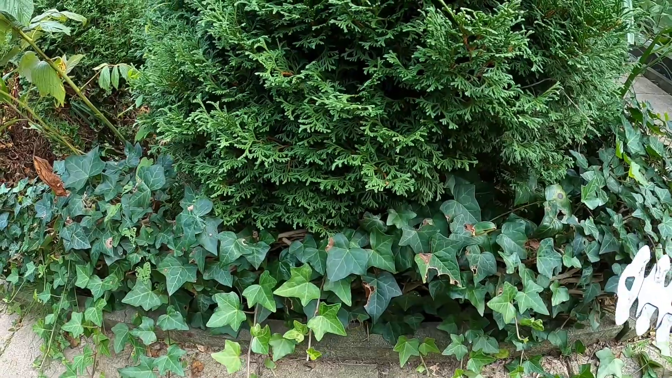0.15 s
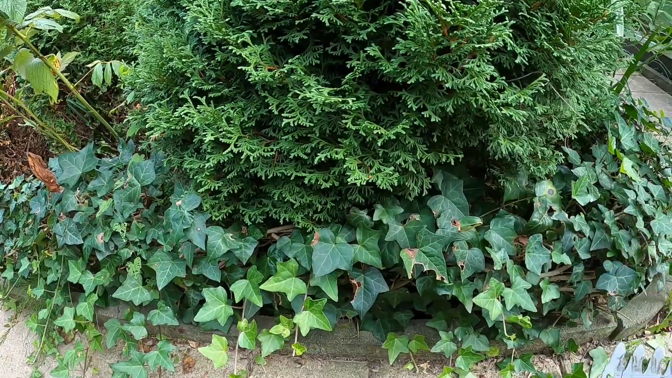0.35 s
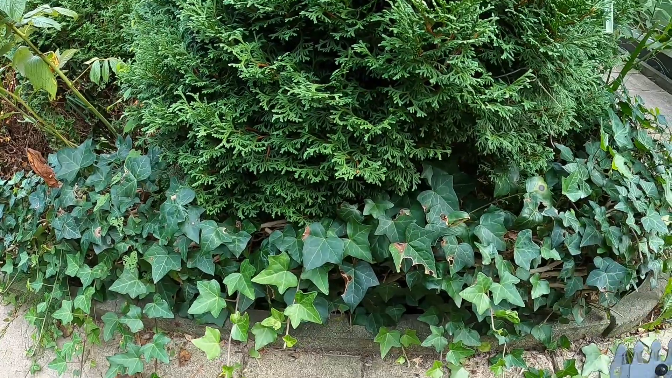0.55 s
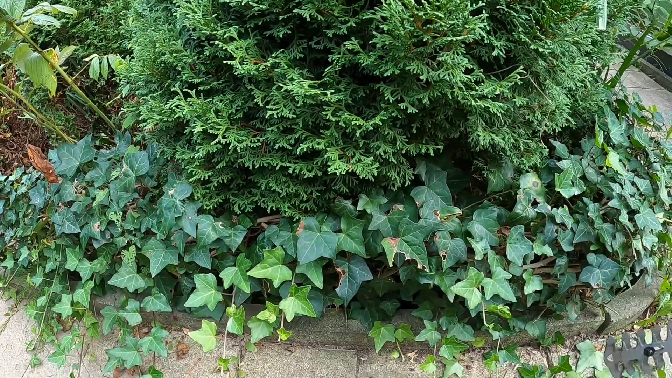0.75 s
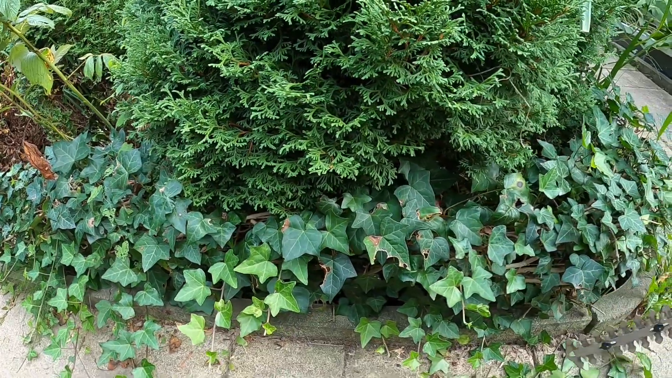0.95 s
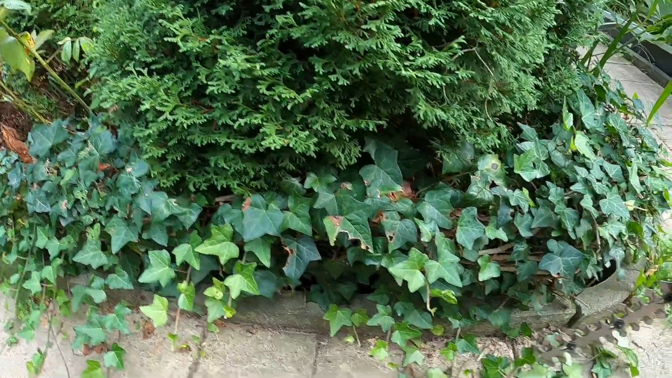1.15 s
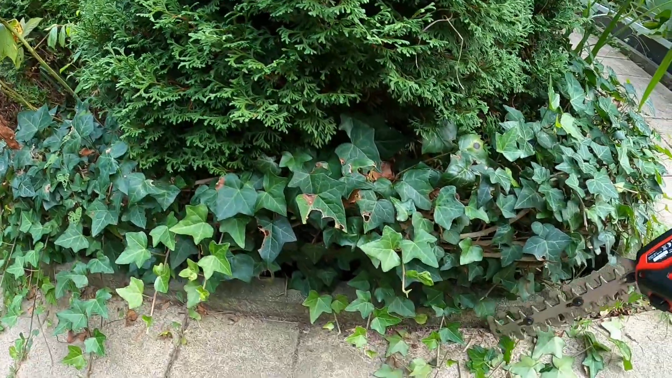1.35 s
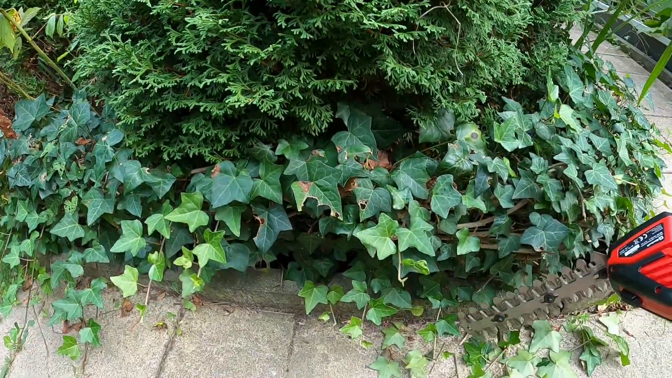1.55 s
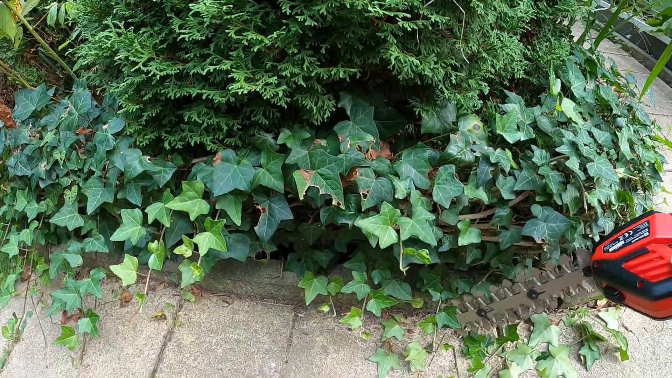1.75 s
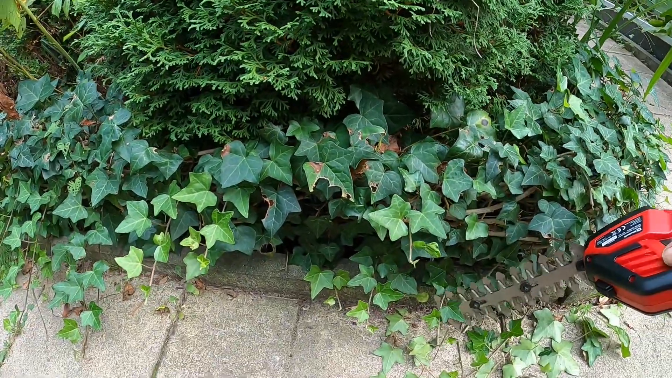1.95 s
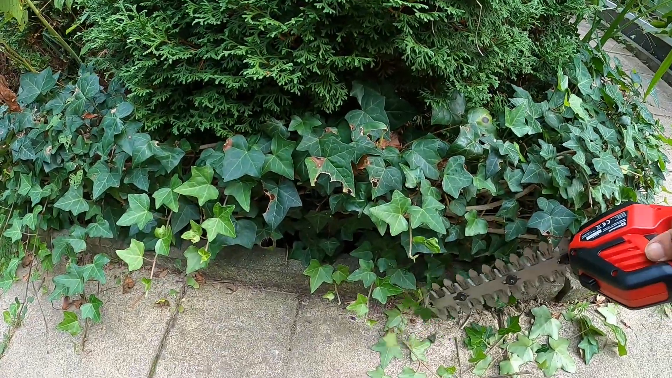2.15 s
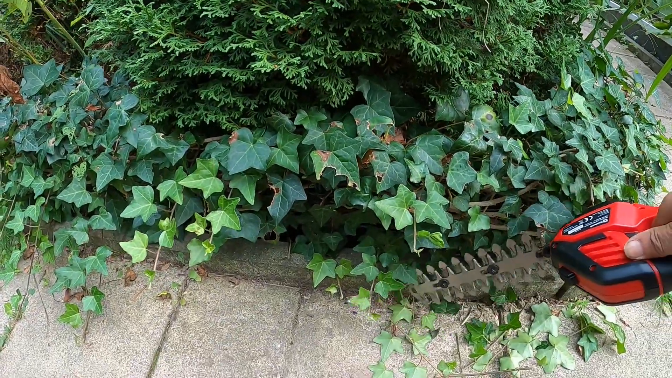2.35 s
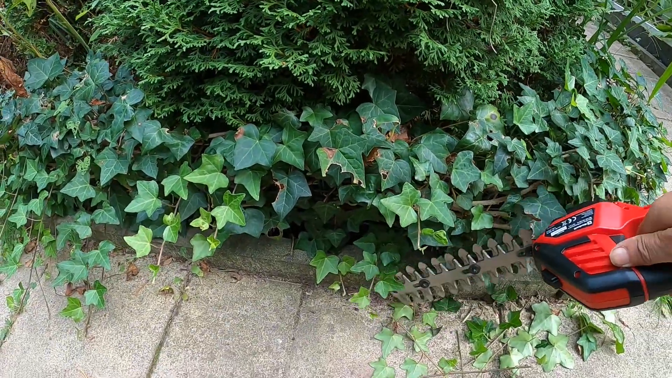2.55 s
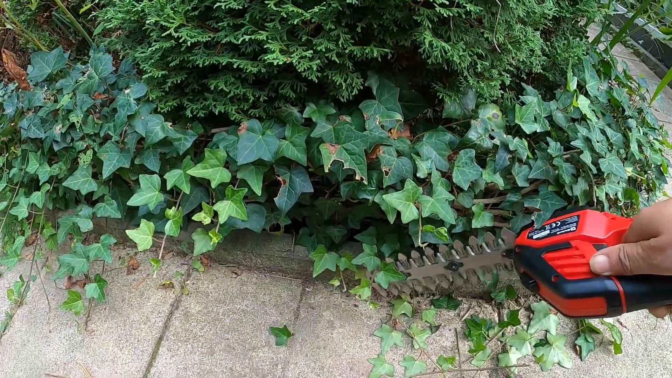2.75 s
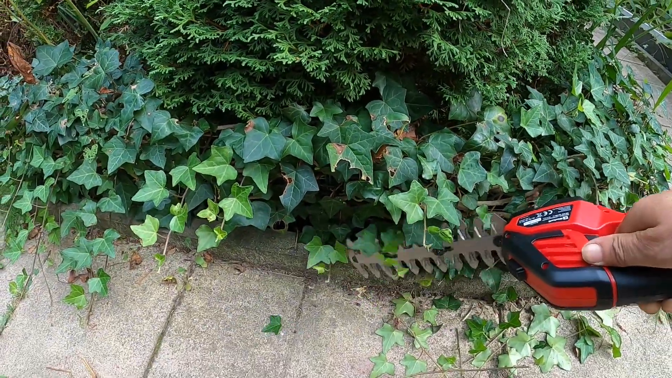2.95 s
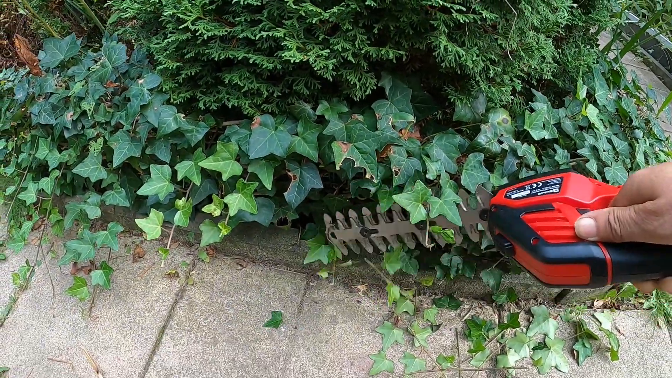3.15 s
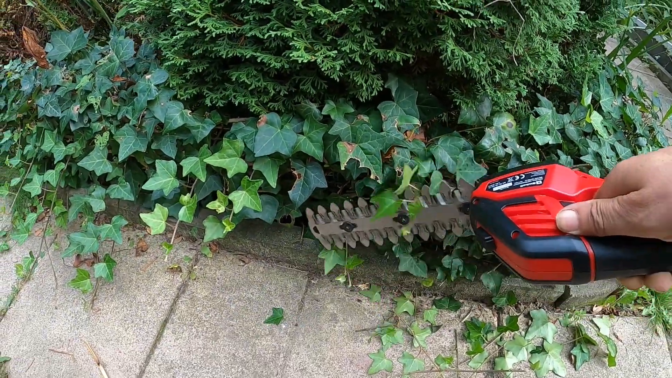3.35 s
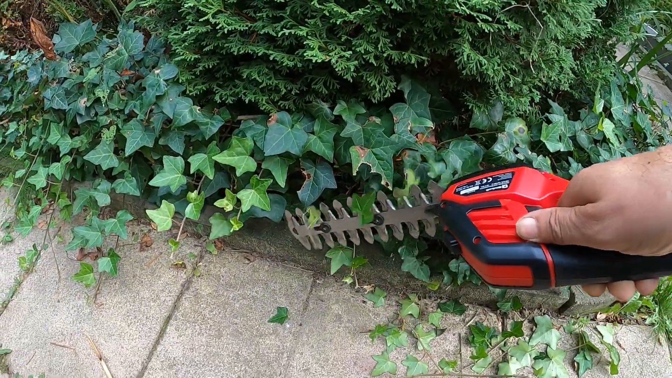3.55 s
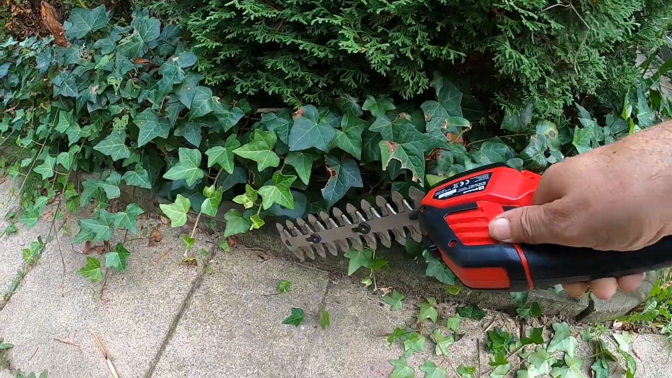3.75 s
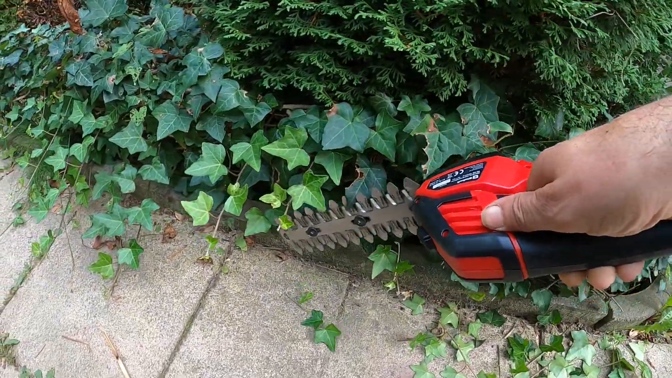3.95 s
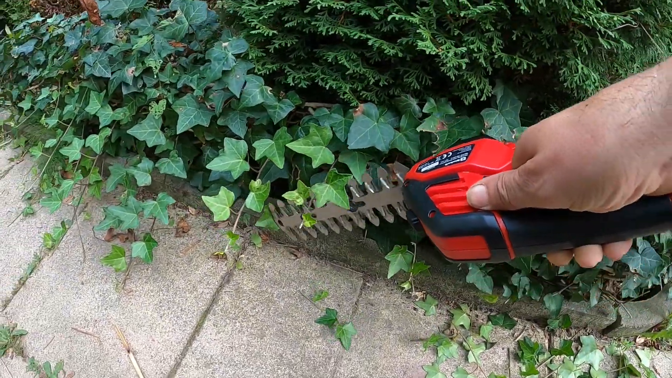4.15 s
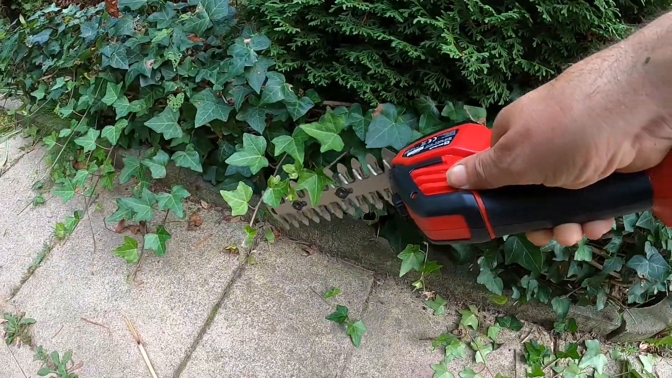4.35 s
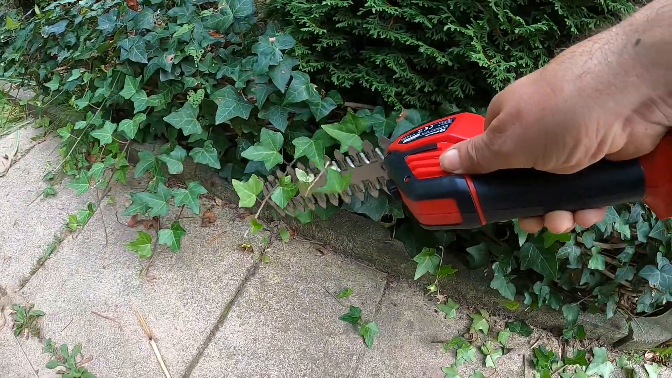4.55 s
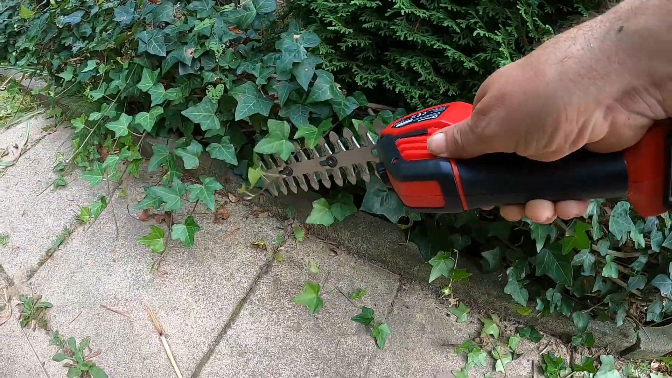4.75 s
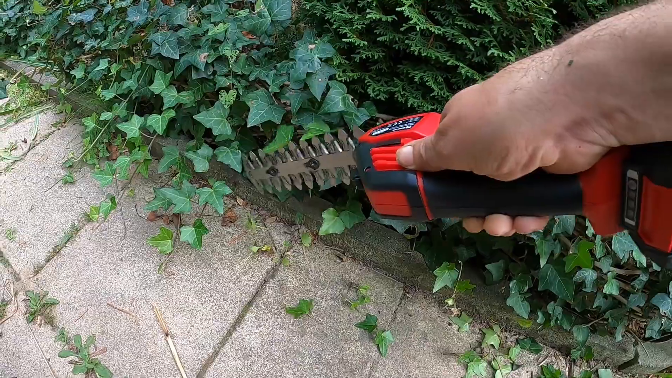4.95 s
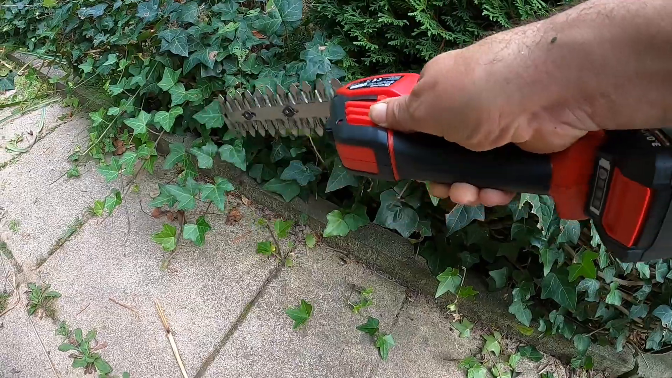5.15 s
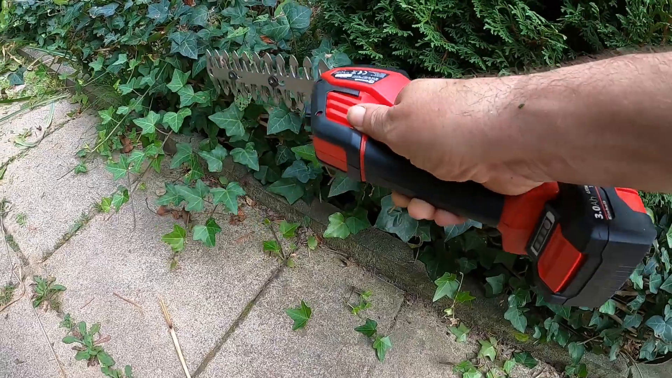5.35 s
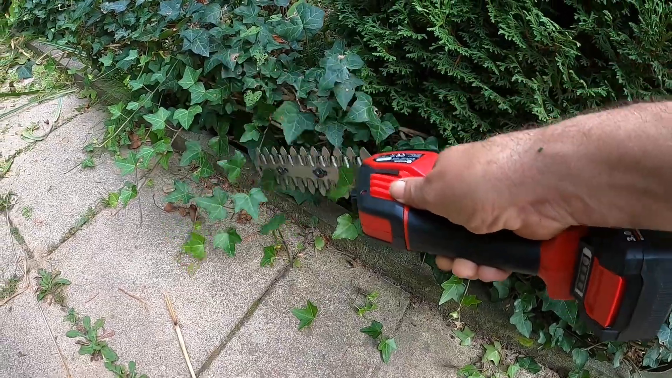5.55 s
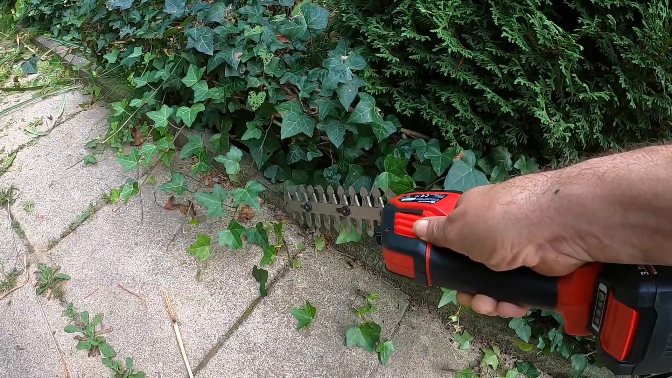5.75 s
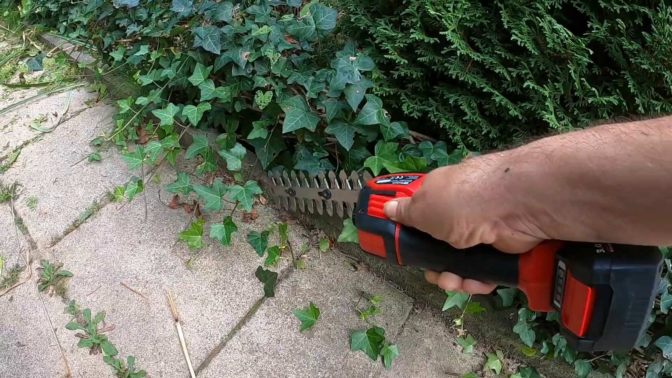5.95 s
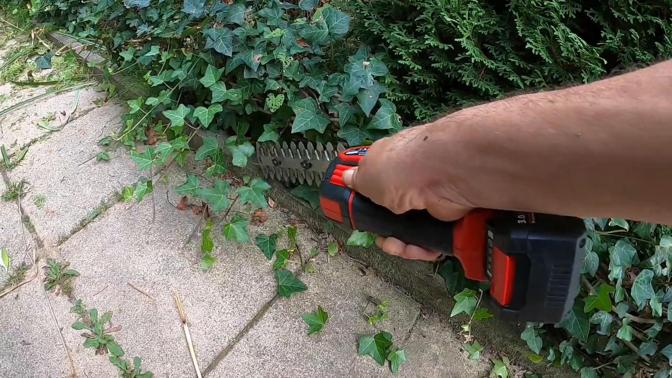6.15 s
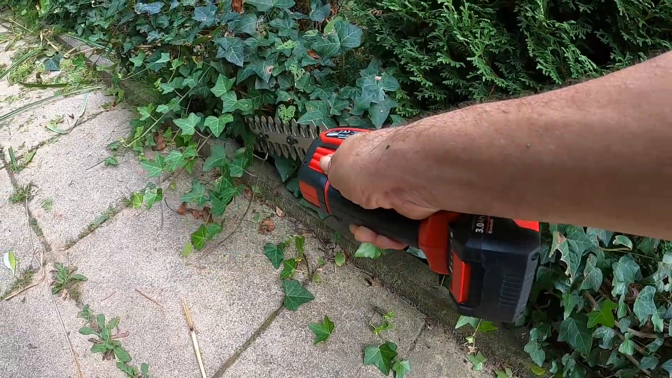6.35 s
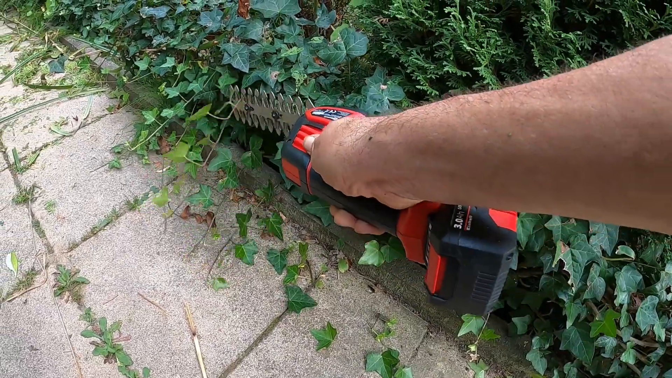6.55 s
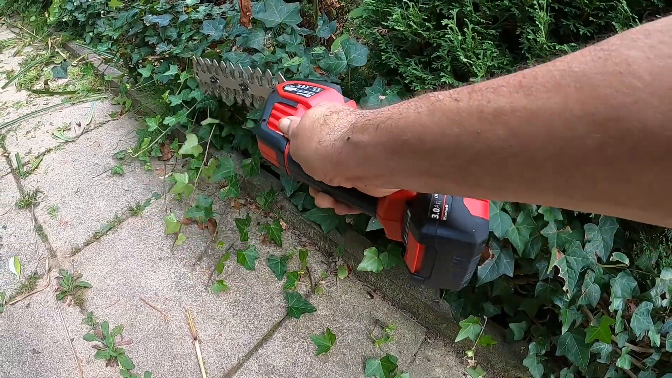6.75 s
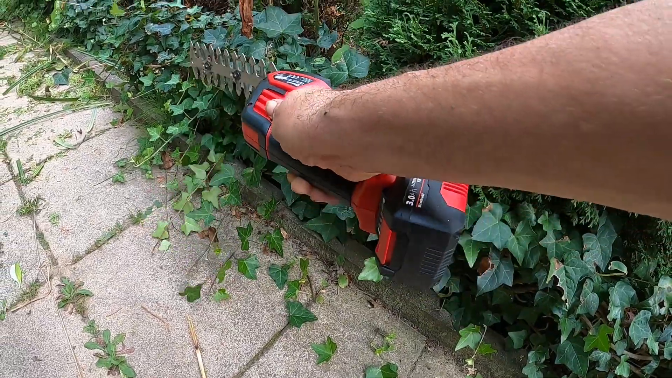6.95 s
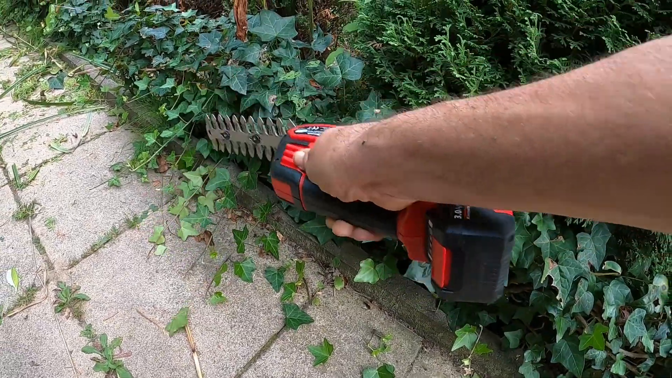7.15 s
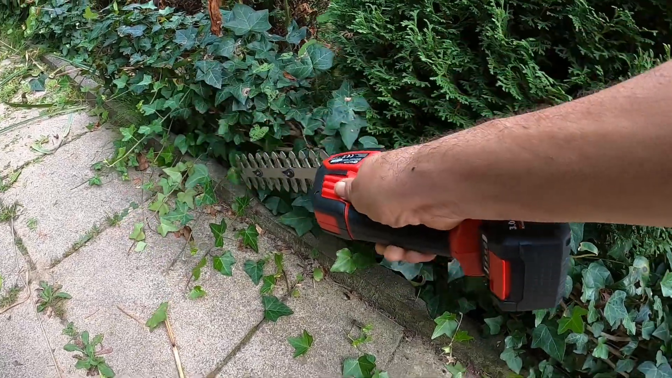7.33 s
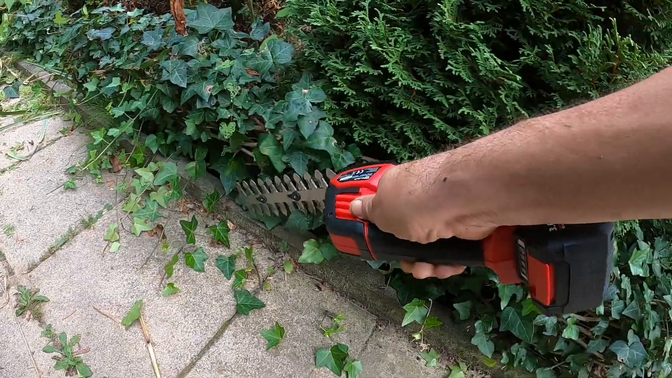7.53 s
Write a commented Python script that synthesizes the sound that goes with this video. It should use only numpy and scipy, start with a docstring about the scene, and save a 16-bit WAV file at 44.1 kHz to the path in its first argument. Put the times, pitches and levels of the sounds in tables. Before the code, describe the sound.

A brief quiet moment of distant traffic, fading far whine and thin bird whistles, then a light click and a cordless hedge trimmer bursts on at arm's length. Dry, bright, buzzing gear rattle pulses rapidly as the blades reverse, its tone shifting as the tool swings. Close open-air stereo pickup with slight reflections from paving and hedge; it is still running when the sound ends.

```python
"""Traffic rumble, road hiss, a distant engine and a fading far whine lie behind two thin bird whistles.
A switch ticks; an arm's length to the right a battery hedge trimmer starts and swings round to ahead.
A 9-tooth pinion drives a 38-tooth crank gear: teeth rattle harder under load and float as blades reverse.
Noise blows ring the casing, sines make the gear whine; paving, kerb and hedge return delayed copies."""
import sys
import numpy as np
from scipy import signal
from scipy.fft import rfft, irfft, next_fast_len
from scipy.io import wavfile
from scipy.ndimage import uniform_filter1d, map_coordinates

SR = 44100
rng = np.random.default_rng(int(sys.argv[2]) if len(sys.argv) > 2 else 0)


def boost(x):
    """Linear amplitude factor 10**(x/20) for a level x in decibels (scalar or array-like)."""
    u = np.asarray(x, float) / 20
    return 10 ** u


def generate_wav(signal):
    """Clip the signal to [-1, 1] and save it as 16-bit WAV at the path in sys.argv[1]."""
    frames = np.transpose(np.atleast_2d(signal))
    scaled = np.clip(frames, -1, 1) * 32767
    pcm = np.round(scaled).astype(np.int16)
    wavfile.write(sys.argv[1], SR, pcm)


N = 339129
T = np.arange(N) / SR  # s
HZ = np.fft.rfftfreq(2 * next_fast_len(N // 2 + SR // 8), 1 / SR)  # padded spectrum grid

STROKE_RATE_HZ = 25.865  # crank turns per s
PINION_TEETH, GEAR_TEETH = 9, 38


def shape(x, gain):
    """Multiply the spectrum by a gain on the HZ grid."""
    return irfft(rfft(x, 2 * len(HZ) - 2) * gain)[..., :N]


def points(table):
    """dB of (Hz, dB) points, straight on a log axis."""
    hz, db = np.transpose(table)
    return np.interp(np.log(HZ + 1), np.log(hz), db)


def bell(hz, width_hz):
    """Gain of a resonance, 1 at its centre."""
    return 1 / (1 + (2 * (HZ - hz) / width_hz) ** 2)


def band(low_hz, high_hz):
    """Flat pass band with steep skirts."""
    return 1 / np.sqrt((1 + (low_hz / (HZ + 1)) ** 12) * (1 + (HZ / high_hz) ** 12))


def level(x, db):
    """Set the rms."""
    return x * boost(db) / np.sqrt(np.mean(x ** 2))


def walk(rate_hz):
    """Random levels held 1 / rate_hz s and slewed twice; spread near 1."""
    k = int(SR / rate_hz)
    held = np.repeat(rng.standard_normal(N // k + 1), k)
    return 1.47 * uniform_filter1d(uniform_filter1d(held, k), k)[:N]


def late(x, ms):
    """Delay by a time that may vary from sample to sample."""
    return map_coordinates(x, [np.arange(N) - ms * SR / 1000], order=3)


def after(s, time_constant_s):
    """Smooth step from 0 to 1 around a moment."""
    return .5 + .5 * np.tanh((T - s) / time_constant_s / 2)


def traffic():
    """Deep rumble and drone, nearly alike at both ports, under a wider road hiss that fades with the drone."""
    # traffic levels: time_s, deep_db, drone_db
    passing = [(0.0, -30, -33.5), (1.03, -59, -42.5), (2.48, -45, -43.5), (4.35, -59, -47.5),
               (5.95, -48.5, -52.5), (7.69, -65, -49.5)]
    # drone spectrum: hz, db_per_hz
    drone_colour = [(29, -28), (50, 9), (102, -2.5), (150, -1.5), (327, -9.5), (361, -19), (420, -32),
                    (550, -47), (920, -120)]
    # road hiss spectrum: hz, db_per_hz
    road_colour = [(180, -44), (300, 7.5), (388, -13), (618, -6), (775, -9), (957, -1), (1800, -9),
                   (1970, -8), (3500, -22), (5930, -29.5), (11000, -54), (14300, -91), (22000, -120)]
    s, deep_db, drone_db = np.transpose(passing)
    deep_db, drone_db = np.interp(T, s, deep_db), np.interp(T, s, drone_db)

    mid, side = rng.standard_normal((2, 3, 1, N))
    side_share = np.array([.08, .14, .45])[:, None, None]  # deep, drone, hiss
    noise = mid + side_share * side * np.array([[1], [-1]])

    deep = shape(noise[0], band(16.0, 55) * boost(7.3 * bell(42.0, 3.3)))
    deep = level(deep, 0) * boost(deep_db)
    drone = shape(noise[1], boost(points(drone_colour)) * band(60.0, 258))
    drone = level(drone, 0) * boost(drone_db)
    hiss = level(shape(noise[2], boost(points(road_colour)) * band(318, 10000)), -41.5)
    hiss_db = walk(3.0) + .5 * (drone_db - drone_db[0])
    return deep + drone + hiss * boost(hiss_db)


def engine():
    """A distant engine slows, then picks up in another gear: partials of the firing rate waver singly."""
    # engine run: time_s, firing_hz, level_db
    run = [(0, 41.95, -40), (.3, 41.04, -38), (.8, 40.1, -44), (1.299, 35.5, -53), (2.3, 34.77, -47.5),
           (3.1, 34.37, -48.5), (4.701, 33.5, -63), (5.1, 44.5, -61), (6.5, 44.96, -47.5),
           (7.69, 44.4, -58)]
    # partials: multiple, level_db
    partials = [(1, 0), (2, -8), (3, -8), (4, -4), (6, -11)]
    s, hz, db = np.transpose(run)
    cycles = np.cumsum(np.interp(T, s, hz)) / SR
    hum = np.zeros(N)
    for multiple, partial_db in partials:
        phase_turns = multiple * cycles + rng.random() + .12 * walk(4)
        hum += boost(partial_db + 3 * walk(3)) * np.sin(2 * np.pi * phase_turns)
    return hum * boost(np.interp(T, s, db))


def far_whine():
    """Breathy partials of a far machine: narrow noise bands, fading steadily."""
    # partials before the fade: multiple, rms_db
    partials = [(1, -51), (3, -58), (4, -62)]
    pitch_hz, width_hz, fade_db_per_s = 655, 40, 30
    whines = np.zeros(N)
    for multiple, db in partials:
        noise = rng.standard_normal(N)
        whines += level(shape(noise, bell(multiple * pitch_hz, multiple * width_hz)), db)
    return whines * boost(-fade_db_per_s * T)


def bird():
    """Thin arched whistles, far off: sines that rise to a top pitch and fall again."""
    # whistles: start_s, end_s, level_db
    whistles = [(-.04, 0.047, -68), (.112, 0.19, -68)]
    top_hz, arch_hz = 8260, 1500  # arch: fall to both ends
    out = np.zeros(N)
    for start_s, end_s, db in whistles:
        u = np.clip((T - start_s) / (end_s - start_s), 0, 1)
        hz = top_hz - arch_hz * (2 * u - 1) ** 4
        swell = np.sqrt(np.abs(np.sin(np.pi * u))) * (u < 1)
        out += boost(db) * swell * np.sin(2 * np.pi * np.cumsum(hz) / SR)
    return out


def trigger():
    """A plastic tick as the finger takes up the switch: a 3 ms noise burst through broad resonances."""
    # tick: start_s, peak_db, centre_hz, width_hz
    tick_setting = (.4885, -31, 4800, 220)
    start_s, peak_db, hz, width_hz = tick_setting
    burst = rng.standard_normal(N) * (T > start_s) * (T < start_s + .003)
    tick = shape(burst, (bell(hz, width_hz) + .06 + .35 * bell(2000, 3500)) * band(900, 11000))
    return tick * boost(peak_db) / np.abs(tick).max()


def tooth_load_db(crank, pinion):
    """Load on the teeth from crank angle, off-centre pinion and loss of contact; angles in turns."""
    # load swing over a crank turn: times_per_turn, swing_db, peak_turn
    swings = [(1, 2.1, .041), (2, .75, .18), (3, .75, .236)]
    # crank pin crosses its slot, load slackens, blades are caught again: crank_turn, spread_turns, gain_db
    catches = [(.602, .02, -2.4), (.681, .026, 1.7)]
    # reversal meets the pinion's slack side, teeth lose contact:
    # crank_turn, spread_turns, slack_pinion_turn, slack_spread_turns, gain_db
    contact_loss = (.323, .08, .017, .165, -4.2)
    off_centre_db, off_centre_load_db, off_centre_turn = 1.9, .8, .036
    pinion_high_turn = .51  # presses hardest

    db = sum(swing_db * np.cos(2 * np.pi * times * (crank - turn)) for times, swing_db, turn in swings)
    for turn, spread, catch_db in catches:
        db += catch_db * np.exp(-.5 * ((crank % 1 - turn) / spread) ** 2)
    off_db = off_centre_db + off_centre_load_db * np.cos(2 * np.pi * (crank - off_centre_turn))
    db += off_db * np.cos(2 * np.pi * (pinion - pinion_high_turn))

    middle, spread, slack, slack_spread, float_db = contact_loss
    # pinion angle at the start of each crank turn: nine cases that repeat
    meeting = (np.floor(crank) * GEAR_TEETH / PINION_TEETH - slack + .5) % 1 - .5
    window = np.exp(-.5 * ((crank % 1 - middle) / spread) ** 2)
    return db + float_db * window * np.exp(-.5 * (meeting / slack_spread) ** 2)


def worn_teeth():
    """Noise that partly returns after one pinion turn and after four, as the same flaws meet again."""
    share_one, share_four, fade_hz = .09, .09, 3800  # repeats weaken above fade_hz
    turn = np.exp(-2j * np.pi * HZ * PINION_TEETH / GEAR_TEETH / STROKE_RATE_HZ)
    again = (share_one * turn + share_four * turn ** 4) / np.sqrt(1 + (HZ / fade_hz) ** 6)
    return shape(rng.standard_normal(N), 1 / (1 - again))


def rattle(crank, pinion):
    """Uneven tooth blows and sliding steel ring the casing; a fan hisses and reversing blades knock."""
    # casing spectrum: hz, db_per_hz
    body = [(120, -27), (200, -18.5), (385, -19), (653, -4), (827, -5), (1230, -0.5), (1740, -2.5),
            (1910, -1), (2420, -4.5), (3300, 0), (4830, -4.5), (5390, -5), (6470, -10.5), (12500, -34),
            (15500, -50)]
    # casing resonances: hz, width_hz, gain_db
    casing = [(1200, 460, 0), (2280, 74, 1), (3780, 330, 3), (4900, 500, 2), (2780, 250, 2.5),
              (3244, 180, 4), (6280, 200, 4)]
    # knock bands: hz, width_hz, rms_db
    knock_bands = [(720, 220, -22.5), (5300, 3000, -25)]
    heavy_hz, heavy_share = 1400, .6  # heavy lower casing follows only this share of the load swing in dB
    fan_db, fan_hz = -18.5, 9400  # rms against the teeth; stronger above fan_hz
    knock_turn, knock_s = 0.473, 0.0026

    colour = boost(points(body) + sum(db * bell(hz, width_hz) for hz, width_hz, db in casing))
    tooth = (pinion * PINION_TEETH).astype(int)
    size = boost(1.5 * rng.standard_normal(tooth[-1] + 1))[tooth]
    blow = 1 + .35 * np.exp(-(pinion * PINION_TEETH % 1) / .3)
    blows = worn_teeth() * size * blow
    load = boost(tooth_load_db(crank, pinion) + .4 * walk(9) + .6 * walk(90))
    heavy = 1 / (1 + (HZ / heavy_hz) ** 4)
    light_part = shape(blows * load, colour * (1 - heavy))
    heavy_part = shape(blows * load ** heavy_share, colour * heavy)
    teeth = level(light_part + heavy_part, 0)

    fan = level(shape(rng.standard_normal(N), colour * (0.43 + band(fan_hz, 20000))), fan_db)

    since_s = (crank - knock_turn) % 1 / STROKE_RATE_HZ
    pulse = since_s / knock_s * np.exp(-2 * since_s / knock_s)
    hit = rng.standard_normal(N) * pulse * boost(1.5 * walk(25))
    knock = sum(level(shape(hit, bell(hz, width_hz) * band(280, 15000)), db)
                for hz, width_hz, db in knock_bands)
    return teeth + fan + knock


def whine(pinion, ahead):
    """Gear tones around the tooth rate, wavering and growing as the gearbox comes round."""
    # tones: pinion_order, rms_db halfway round, gain_db from far right to ahead
    tones = [(8, -48, 11), (9, -45.5, 8), (10, -44.5, 5), (11, -46, 3), (18, -47, 1), (20, -49, 2)]
    out = np.zeros(N)
    for order, db, ahead_db in tones:
        size = np.sqrt(2) * boost(db + ahead_db * ahead + 1.2 * walk(2.5))
        phase_turns = order * pinion + rng.random() + 0.12 * walk(2.0)
        out += size * np.sin(2 * np.pi * phase_turns)
    return out


def colour_swell(x, middle_s, length_s, hz, glide_hz_per_s, gain_db):
    """What a passing boost or dip in tone colour adds: the band around a gliding centre, under a swell."""
    pole_width_hz = 190
    span = np.abs(T - middle_s) < length_s
    since_s = T[span] - middle_s
    turn = np.exp(2j * np.pi * (hz * since_s + glide_hz_per_s * since_s ** 2 / 2))
    pole = np.exp(-np.pi * pole_width_hz / SR)
    # shift the band to 0 Hz, low-pass, shift back
    part = 2 * np.real(turn * signal.filtfilt([1 - pole], [1, -pole], x[span] / turn))
    swell = np.exp(-2 * (since_s / length_s * 2) ** 2)
    out = np.zeros(N)
    out[span] = (boost(gain_db * swell) - 1) * part
    return out


def bounces(x):
    """Kerb, hedge and arm send back weak copies whose delays drift as the tool moves."""
    # nominal delays: delay_ms
    delays_ms = np.array([2.3, 3.9, 6.1, 9.2])
    # reflection of nearby surfaces: hz, gain_db
    scatter = [(300, -25), (1400, -15), (4000, -14.5), (8000, -19.5), (15000, -32)]
    drawn_ms = delays_ms * rng.uniform(.85, 1.15, len(delays_ms))
    total = sum(late(x, ms * (1 + .1 * walk(3))) for ms in drawn_ms)
    return shape(total, boost(points(scatter)))


def trimmer():
    """The tool as two ports hear it, carried from far right to ahead, with paving echo and scatter."""
    # hand path: time_s, level_db, come_round (0-1)
    hand = [(.68, -18.5, 0.25), (1.4, -22, 0), (2.2, -24, 0.12), (3.4, -22, 0.45), (3.9, -20.5, 0.44),
            (5.2, -20.5, 0.77), (6.4, -20, 0.9), (7.66, -18.5, 1)]
    # ringing parts: hz, width_hz, away_db while pointing away, ahead_db gained from far right to ahead
    parts = [(1186, 860, -9, -2.5), (1700, 280, -2.5, -8), (2930, 260, 4, 0), (3730, 2200, -7.5, -3),
             (5000, 310, -1.5, 2.5), (9600, 7800, -8, -3), (2290, 330, 9, -.5), (3300, 250, -4, -1),
             (6270, 260, -1, 6)]
    # duller treble until the lift: hz, width_hz
    shade_band = (7880, 2370)
    # passing boosts and dips in the tool's tone colour, some gliding:
    # middle_s, length_s, hz, glide_hz_per_s, gain_db
    colour_swells = [(1.1, 1.2, 2690, 0, -6), (2.2, 2.2, 1260, 0, 6), (2.2, 1.4, 5620, 0, 6),
                     (2.1, 1.3, 4050, 0, 4), (2.95, .8, 3270, 0, -7), (2.95, .9, 3520, -250, 7),
                     (3.0, 1.8, 1520, 0, -5), (5.1, 1.3, 2190, 0, 8), (5.1, 1.4, 3030, 0, -5),
                     (2.5, 2.5, 4580, 0, 3), (2.61, 2.5, 7800, -100, 5.5), (3.8, 0.29, 3300, 0, 5.5),
                     (3.9, 0.59, 4050, 0, -5), (5.3, 2, 3230, 0, 3), (6.1, 0.66, 1500, 200, 4),
                     (6.35, 0.9, 4860, 0, 3.5), (4.2, 8, 5330, 30, -8), (6.6, 0.43, 3550, 200, 8),
                     (7.1, 1.5, 5000, 0, 4.5)]
    # extra path to the left port while far right: time_s, delay_ms
    sideways = [(.6, .018), (1.2, .014), (3.3, .01), (4, 0)]
    # phase by which the left port leads: hz, lead_rad
    port_lead = [(0, 0.27), (1210, 0.29), (1550, -0.6), (1810, -0.77), (3700, -0.97), (4910, -1.64),
                 (5340, -2.08), (5770, -1.4), (6030, -1.43), (6370, -0.59), (15200, 0.58)]
    # port balance: hz, left_minus_right_db
    ears = [(60, 6), (110, 15), (200, -2.5), (380, -4), (700, -2.5), (1290, -4.5), (2380, -2), (4400, -2.5),
            (8120, -7), (15000, -15)]
    switch_s, rise_s = .623, .012
    turns_in_s, turn_time_constant_s = 1.16, 0.22  # swings its flank to the listener
    lift_at_s, lift_time_constant_s, lift_db = 2.05, 0.016, 5
    drift_db, drift_hz = .5, 1.6  # each part also wanders alone
    left_away_db, left_ahead_db = 2, 3.5  # shift to the left while pointing away, and over the sweep

    s, hand_db, come_round = np.transpose(hand)
    ahead = np.interp(T, s, come_round) - .5
    away = 1 - after(turns_in_s, turn_time_constant_s)
    crank = STROKE_RATE_HZ * T
    pinion = crank * GEAR_TEETH / PINION_TEETH
    on = np.clip((T - switch_s) / rise_s, 0, 1) ** 2

    bare = rattle(crank, pinion)
    noise = bare.copy()
    for hz, width_hz, away_db, ahead_db in parts:
        part_db = away_db * away + ahead_db * ahead + drift_db * walk(drift_hz)
        noise += (boost(part_db) - 1) * shape(bare, bell(hz, width_hz) ** 2)
    lift = boost(lift_db * after(lift_at_s, lift_time_constant_s))
    noise = noise + (lift - 1) * shape(noise, bell(*shade_band))

    near = boost(np.interp(T, s, hand_db)) * noise + whine(pinion, ahead)
    near = on * (near + sum(colour_swell(near, *row) for row in colour_swells))
    near = near + boost(-17) * late(near, .85 + .06 * walk(1.2))  # paving echo

    left = late(near, np.interp(T, *np.transpose(sideways)))
    left = shape(left, np.exp(1j * np.interp(HZ, *np.transpose(port_lead))))
    side = np.array([[.5], [-.5]])
    pair = shape(np.array([left, near]), boost(side * points(ears)))
    pair = pair * boost(side * (left_away_db * away + left_ahead_db * ahead))
    return pair + np.array([bounces(port) for port in pair])


def scene():
    """Traffic, engine, far whine, bird, switch and tool; the bird leans to the right."""
    background = traffic() + engine() + far_whine() + bird() * np.array([[.6], [1.3]])
    return background + trigger() + trimmer()


def band_limit(x):
    """A steep low-pass at the top of the band."""
    return signal.sosfilt(signal.butter(12, 15640, fs=SR, output="sos"), x)


def record(dry):
    """The input fades in over 5 ms and rounds the loudest peaks."""
    fade = np.minimum(T / .005, 1)
    rounded = fade * np.tanh(1.307 * dry) / 1.374
    return band_limit(rounded)


dry = scene()
out = record(dry)
generate_wav(out)
```